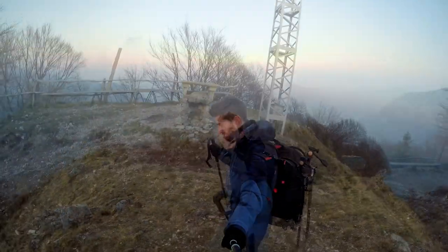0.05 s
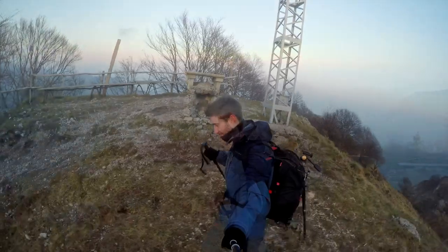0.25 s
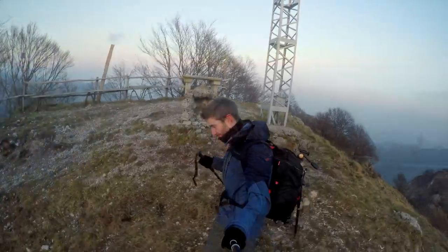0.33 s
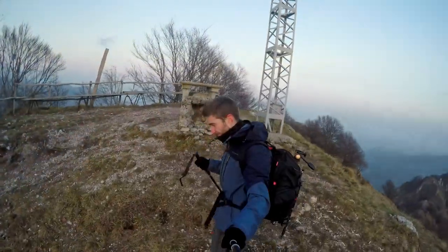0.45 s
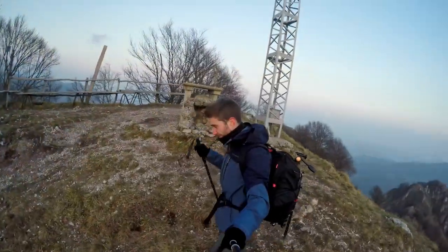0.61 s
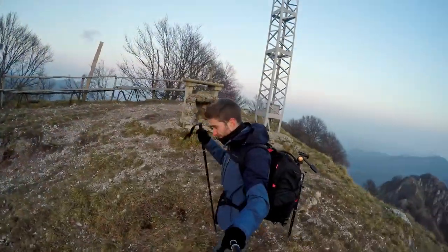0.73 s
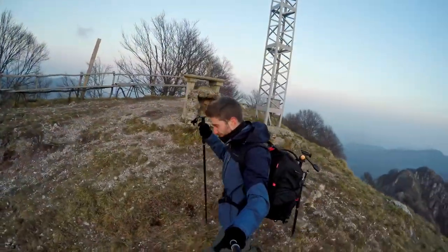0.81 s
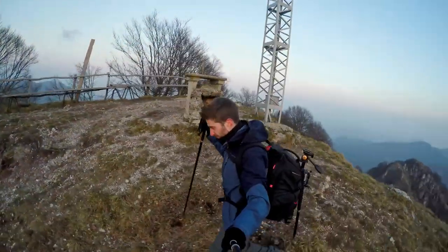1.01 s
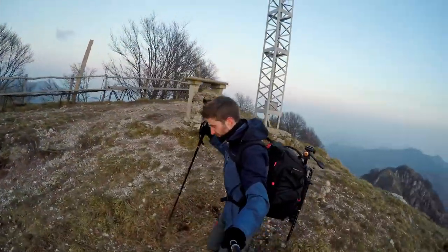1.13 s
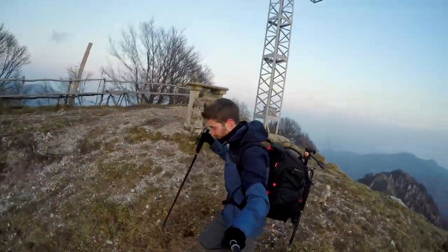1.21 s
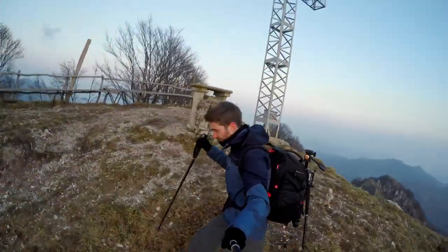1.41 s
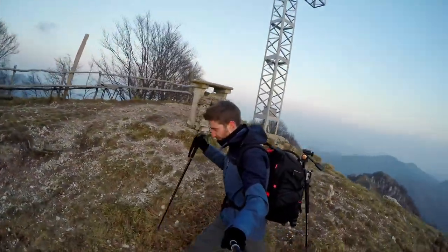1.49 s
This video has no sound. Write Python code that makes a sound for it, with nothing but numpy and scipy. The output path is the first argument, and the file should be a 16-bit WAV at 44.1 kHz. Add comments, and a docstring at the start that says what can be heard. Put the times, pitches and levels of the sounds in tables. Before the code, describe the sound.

A hiker's poles give three quick, rattling clacks followed by a dull knock on rock, among softer taps and scuffing steps. Outdoors on a stony slope, wind rumbles on the microphone over a thin hiss, with no echo.

```python
"""Wind buffets the microphone over a thin hiss as a hiker climbs a grassy, stony ridge.
Trekking poles clack three times: each blow rebounds, rattles and rings the tube.
Then a tip knocks dully on stone, among softer taps, low thumps and grainy scuffs.
Open air, no echo."""
import sys
import numpy as np
from scipy import signal
from scipy.fft import rfft, irfft
from scipy.io import wavfile
from scipy.ndimage import uniform_filter1d

SR = 44100
rng = np.random.default_rng(int(sys.argv[2]) if len(sys.argv) > 2 else 0)


def int16_out(signal):
    """Quantize to a 16-bit WAV file."""
    q = np.round(np.clip(np.atleast_2d(signal).T, -1, 1) * 32767)
    wavfile.write(sys.argv[1], SR, q.astype(np.int16))


N = 68355

# Pole clacks (time [s], gain [dB], shaft mode [Hz], its gain [dB], second mode [Hz], its gain [dB],
# tip mode [Hz], its gain [dB], notch [Hz], notch width [Hz], rattle t60 [s], low cut [Hz],
# high cut [Hz], slide hiss [dB], rebound delay [s], rebound [dB])
POLE_CLACKS = [(0.4680, -6.5, 5760, 14, 1840, 1.5, 10500, 6, 8700, 2600, 0.063, 413, 13200, -28, 0.0056, -2),
               (0.4961, -6.5, 2665, 15.5, 4240, 9.5, 9600, 13.5, 1470, 350, 0.03, 520, 10700, -20.5, 0.0054, -3.5),
               (0.5155, -27, 4650, 16, 8300, 18, 10300, 14, 6500, 1000, 0.02, 800, 12000, -24, 0.003, -16),
               (0.6279, -11, 2640, 1, 1590, 3, 10700, 5, 3380, 700, 0.029, 890, 14900, -11, 0.003, -7.5)]
# Clack contact spectrum (frequency [Hz], gain [dB])
CLACK_SPECTRUM = [(200, -22), (600, -1.5), (1000, 7), (1400, -1), (2000, -2), (2900, -1.5), (3500, -10.5),
                  (4300, -9), (6000, -13.5), (8000, -13), (11000, -16), (12500, -20), (15000, -38)]
# Ringing modes of the tube (frequency [Hz], gain [dB], t60 [s])
TUBE_MODES = [(945, -31.5, 0.082), (1710, -24, 0.044), (2153, -53, 0.019), (2695, -28.5, 0.06),
              (3080, -30.5, 0.087), (4230, -26, 0.027), (4860, -28, 0.03), (5490, -30, 0.047),
              (6520, -37.5, 0.066), (8360, -41, 0.073), (10350, -47, 0.067), (10440, -29, 0.044)]
# Tip sliding over grit (frequency [Hz], gain [dB])
SLIDE_SPECTRUM = [(2000, -24), (6000, -7), (9000, 5), (12000, -0.5), (15000, -9)]
# Ground knocks (time [s], gain [dB], mode [Hz], its gain [dB], grit [dB], low cut [Hz], high cut [Hz])
GROUND_KNOCKS = [(0.2313, -19.5, 2520, 10.5, 7, 70, 5000), (0.2965, -23.5, 427, 9.5, 4, 120, 4000),
                 (0.494, -11, 1030, -17, -8, 298, 3000), (0.7793, -11, 1320, 0, -1, 150, 2620),
                 (0.9964, 1, 1200, 5, -13, 328, 13000), (1.1600, -19, 1040, -14, 5, 200, 6000),
                 (1.4130, -23, 850, 3.5, 2, 398, 3000)]
# Knock contact spectrum (frequency [Hz], gain [dB])
KNOCK_SPECTRUM = [(100, -33), (350, 2), (700, 1.5), (1100, 2), (1400, -5.5), (1850, -5.5), (2400, -18.5),
                  (5500, -24.5), (8000, -35), (15000, -33)]
# Boot and gust thumps (time [s], level [dB], pitch [Hz], t60 [s])
LOW_THUMPS = [(0.211, -40, 407, 0.041), (0.232, -34.5, 232, 0.06), (0.296, -31, 374, 0.038),
              (0.345, -34, 227, 0.17), (0.449, -33, 181.5, 0.4), (0.477, -23, 93, 0.084),
              (0.51, -32, 191.3, 0.133), (0.512, -32, 348, 0.091), (0.544, -31, 86.2, 0.3),
              (0.777, -31.5, 309, 0.11), (0.784, -16, 100, 0.033), (0.927, -20, 117, 0.055),
              (0.957, -27.5, 135, 0.061), (1.198, -32, 107, 0.069), (1.229, -31, 201, 0.11)]
# Faint mid-pitched rasp at the start, then scuffs (time [s], length [s], level [dB], centre [Hz],
# sigma [octaves], rise [share of length], grain depth [dB])
RASP_AND_SCUFFS = [(0.05, 0.13, -60.5, 1260, 0.27, .5, -1), (0.212, 0.056, -49, 385, 1.1, 0.3, 1.5),
                   (0.221, 0.031, -54.5, 1350, 0.99, .35, 15), (0.658, 0.045, -63, 4000, .11, .5, -3),
                   (0.648, 0.07, -62, 5330, 0.065, 0.49, 5), (0.787, 0.041, -51.5, 610, 0.73, 0.47, 5),
                   (0.848, 0.33, -54.5, 690, 0.76, 0.17, 1.5), (0.995, 0.099, -56.5, 2800, 0.36, 0.18, 3.5),
                   (0.993, 0.087, -63.5, 5230, 0.35, 0.18, 2), (1.004, 0.08, -54.5, 880, 0.42, 0.25, -8),
                   (1.163, 0.011, -55.5, 2430, 0.23, 0.41, -11), (1.188, 0.19, -55.5, 860, 0.64, 0.25, 2),
                   (1.235, 0.073, -65.5, 3730, 0.81, .3, 8), (1.485, 0.069, -58.5, 2560, 0.42, 0.38, 4),
                   (1.49, 0.063, -54.5, 836, 0.56, 0.29, 2.5), (1.464, 0.15, -59.5, 8950, 1.9, 0.37, 2)]
# Wind rumble envelope (time [s], relative level [dB])
GUST_ENVELOPE = [(0, -44), (.12, -54.5), (.2, -50.5), (.27, -50.5), (.35, -39), (.41, -43), (.5, -32.5),
                 (.58, -40.5), (.66, -37.5), (.73, -40.5), (.84, -40.5), (.98, -38), (1.06, -44.5),
                 (1.15, -55.5), (1.22, -39.5), (1.3, -45.5), (1.42, -71), (1.55, -77)]
# Wind rumble spectrum (frequency [Hz], relative density [dB])
RUMBLE_SPECTRUM = [(20, -6), (35, -22), (60, -3), (95, 0), (140, -1.5), (200, -4), (300, -10), (450, -16.5),
                   (700, -25), (1200, -34), (2500, -52), (6000, -59)]
# Air hiss spectrum (frequency [Hz], relative density [dB])
AIR_SPECTRUM = [(25, 9.5), (100, 13), (500, -4), (1200, -4), (1900, -11.5), (3000, -9.5), (4000, -15.5),
                (5500, -15.5), (8000, -21), (10500, -21.5), (15000, -29.5)]
# Air hiss envelope (time [s], level [dB])
AIR_ENVELOPE = [(0, -57), (.25, -54.5), (.8, -53.5), (1.15, -51), (1.45, -53.5), (1.55, -56.5)]

SHAFT_WIDTH_HZ, TIP_WIDTH_HZ, KNOCK_WIDTH_HZ = 193, 780, 380
RATTLE_DB, RATTLE_LOWPASS_HZ = 2.5, 6500
RING_DB, SNAP_DB = -9.5, -23.5  # snap: contact that bypasses the passband
BEND_DELAY_S, BEND_REF_HZ = 0.001256, 1000  # shaft travel time at this frequency
SLIDE_T60_S, GRIT_T60_S, THUMP_RISE_S = 0.19, 0.1, 0.0079
RUMBLE_DB, BUFFET_DB = -2, 1.5
BAND_LIMIT_HZ = 15600


def clack(gain_db, shaft_hz, shaft_db, second_hz, second_db, tip_hz, tip_db, notch_hz, notch_width_hz,
          rattle_t60_s, low_hz, high_hz, slide_db, rebound_s, rebound_db):
    """Blow, rebound and rattle excite the pole; the strike point sets the modes; the tip slides on."""
    t = np.arange(SR // 4) / SR
    softness = np.exp(-2 * np.pi * RATTLE_LOWPASS_HZ / SR)
    force = amp(RATTLE_DB) * signal.lfilter([1 - softness], [1, -softness], chatter(t, rattle_t60_s))
    add(force, 0, np.ones(1))
    add(force, rebound_s, amp([rebound_db]))
    contact = colour(force, CLACK_SPECTRUM)
    passband = signal.butter(6, [low_hz, high_hz], "bandpass", fs=SR, output="sos")
    body = signal.sosfilt(passband, contact) + amp(SNAP_DB) * contact
    shaft = amp(shaft_db) * resonate(body, shaft_hz, SHAFT_WIDTH_HZ)
    shaft += amp(second_db) * resonate(body, second_hz, SHAFT_WIDTH_HZ)
    tip = amp(tip_db) * resonate(body, tip_hz, TIP_WIDTH_HZ)
    ring = sum(amp(mode_db - 60 * t / t60_s) * np.sin(2 * np.pi * (hz * t + rng.random()))
               for hz, mode_db, t60_s in TUBE_MODES)
    pole = body + shaft + tip + amp(RING_DB) * ring
    pole -= resonate(pole, notch_hz, notch_width_hz)  # band struck at its node
    slide = amp(slide_db) * colour(chatter(t, SLIDE_T60_S), SLIDE_SPECTRUM)
    return amp(gain_db) * shaft_dispersion(pole + slide)


def shaft_dispersion(x):
    """Bending waves: treble arrives first, lows trail."""
    size = 2 * len(x)
    hz = np.fft.rfftfreq(size, 1 / SR)
    lag_cycles = 2 * BEND_DELAY_S * np.sqrt(BEND_REF_HZ * hz)
    return irfft(rfft(x, size) * np.exp(-2j * np.pi * lag_cycles))[:len(x)]


def knock(gain_db, mode_hz, mode_db, grit_db, low_hz, high_hz):
    """Dead blow on bedded stone or turf, then crumbling grit."""
    t = np.arange(SR // 4) / SR
    force = amp(grit_db) * chatter(t, GRIT_T60_S)
    add(force, 0, np.ones(1))
    passband = signal.butter(2, [low_hz, high_hz], "bandpass", fs=SR, output="sos")
    blow = signal.sosfilt(passband, colour(force, KNOCK_SPECTRUM))
    return amp(gain_db) * (blow + amp(mode_db) * resonate(blow, mode_hz, KNOCK_WIDTH_HZ))


def thump(level_db, pitch_hz, t60_s):
    """Soft push of a boot or gust: a low damped sine."""
    t = np.arange(SR // 4) / SR
    attack = np.minimum(t / THUMP_RISE_S, 1)
    return attack * amp(level_db - 60 * t / t60_s) * np.sin(2 * np.pi * pitch_hz * t)


def scuff(length_s, level_db, centre_hz, sigma_oct, rise_share, grain_db):
    """Rasp or scuff: grainy band noise that swells and fades."""
    n = int(length_s * SR)
    white = rng.standard_normal(N)
    roughness = unit_rms(uniform_filter1d(rng.standard_normal(N), size=60))
    grains = white * amp(grain_db * roughness)
    offset_oct = np.log2((np.fft.rfftfreq(N, 1 / SR) + 1) / centre_hz)
    band = np.exp(-.5 * (offset_oct / sigma_oct) ** 2)
    swish = unit_rms(irfft(rfft(grains) * band, N)[:n])
    progress = np.arange(n) / n
    swell = np.minimum(progress / rise_share, np.sqrt((1 - progress) / (1 - rise_share)))
    return amp(level_db) * swell * swish


def wind():
    """Gusts on the microphone: lumpy rumble over smooth air hiss."""
    eddies = uniform_filter1d(rng.standard_normal(N), size=600)
    buffet = unit_rms(uniform_filter1d(eddies, size=400))
    rumble = unit_rms(noise(RUMBLE_SPECTRUM) * amp(BUFFET_DB * buffet))
    air = noise(AIR_SPECTRUM) * amp(curve(AIR_ENVELOPE))
    return rumble * amp(curve(GUST_ENVELOPE) + RUMBLE_DB) + air


def chatter(t, t60_s):
    """Decaying burst of tiny contacts, energy 1."""
    burst = rng.standard_normal(len(t)) * amp(-60 * t / t60_s)
    return burst / np.linalg.norm(burst)


def resonate(x, hz, width_hz):
    """One resonance, peak gain 1."""
    return signal.lfilter(*signal.iirpeak(hz, hz / width_hz, SR), x)


def colour(x, spectrum, size=2048):
    """Minimum-phase filter with the given spectrum."""
    log_gain = np.log(gain_at(spectrum, abs(np.fft.fftfreq(size, 1 / SR))))
    taps = np.fft.ifft(np.exp(np.conj(signal.hilbert(log_gain)))).real
    return signal.fftconvolve(x, taps)[:len(x)]


def noise(spectrum):
    """Steady shaped noise, rms 1."""
    gain = gain_at(spectrum, np.fft.rfftfreq(N, 1 / SR))
    return unit_rms(irfft(rfft(rng.standard_normal(N)) * gain, N))


def gain_at(spectrum, hz):
    """Linear gain from (Hz, dB) points on a log-frequency axis."""
    points_hz, points_db = np.transpose(spectrum)
    return amp(np.interp(np.log(hz + 1), np.log(points_hz + 1), points_db))


def curve(points):
    """(s, value) points joined over the scene."""
    return np.interp(np.arange(N) / SR, *np.transpose(points))


def amp(db):
    """dB to gain."""
    return 10 ** (np.asarray(db) / 20)


def unit_rms(x):
    """Scale to rms 1."""
    return x / np.sqrt(np.mean(x ** 2) + 1e-20)


def add(mix, start_s, sound):
    """Mix in place from start_s."""
    part = mix[round(start_s * SR):][:len(sound)]
    part += sound[:len(part)]


def scene():
    """Clacks, knocks, thumps, a faint rasp and scuffs over wind; mono."""
    mix = wind()
    layers = (clack, POLE_CLACKS), (knock, GROUND_KNOCKS), (thump, LOW_THUMPS), (scuff, RASP_AND_SCUFFS)
    for source, events in layers:
        for start_s, *settings in events:
            add(mix, start_s, source(*settings))
    return mix[None]


def record(dry):
    """Steep linear-phase low-pass."""
    taps = signal.firwin(255, BAND_LIMIT_HZ, window=("kaiser", 8), fs=SR)
    return signal.oaconvolve(dry, taps[None], "same")


dry = scene()
out = record(dry)
int16_out(out)
```